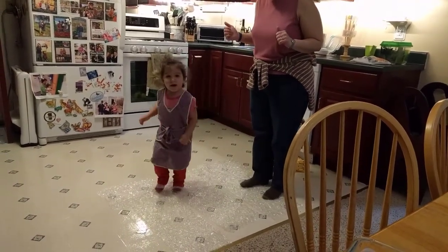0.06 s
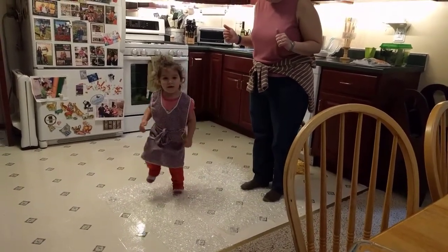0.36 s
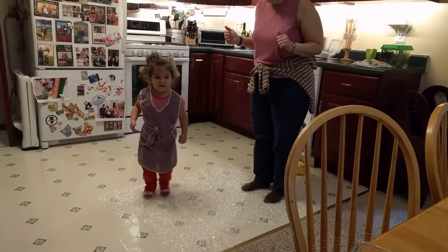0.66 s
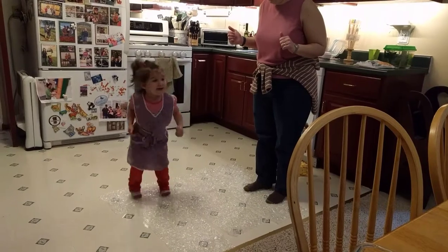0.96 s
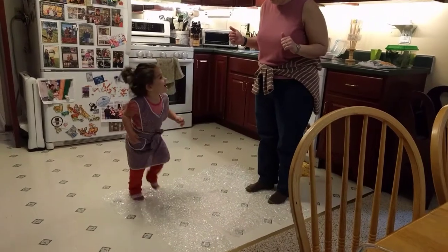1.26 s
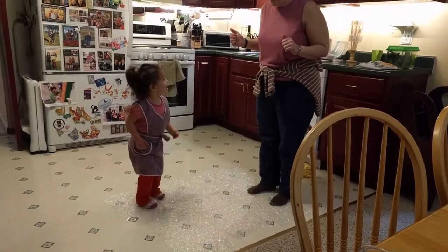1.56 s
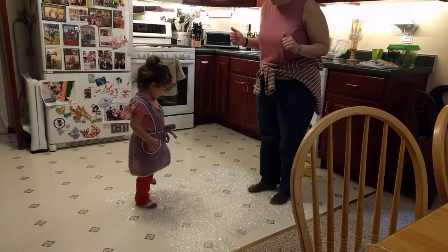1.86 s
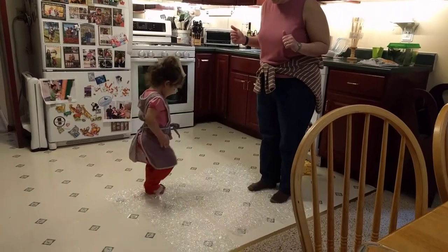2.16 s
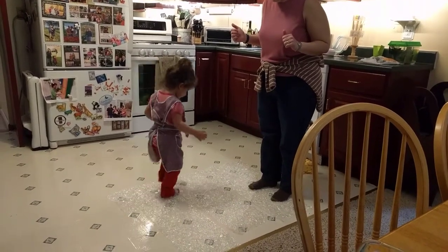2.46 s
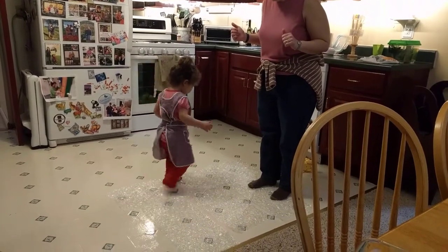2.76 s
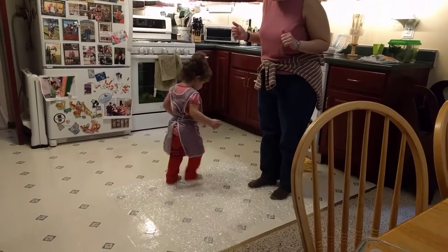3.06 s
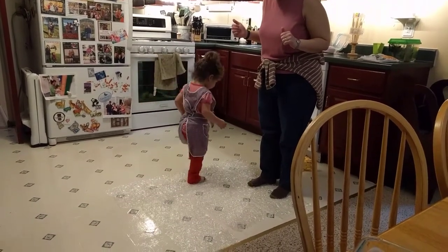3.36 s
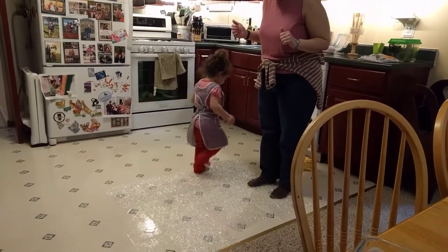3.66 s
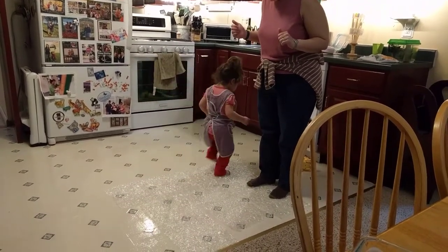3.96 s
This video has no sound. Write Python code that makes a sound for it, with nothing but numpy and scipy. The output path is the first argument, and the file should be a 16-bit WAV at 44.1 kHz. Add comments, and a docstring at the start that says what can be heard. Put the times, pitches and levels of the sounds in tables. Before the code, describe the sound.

Bubble wrap pops sharply and irregularly under a small child's steps, with crinkling plastic and soft thuds on a hard floor. Pops start at once and come singly or in small clusters, with loud ones around 0.5, 1.7 and 2.4 seconds. The heaviest footfalls land at 3.1 and 3.5 seconds, then a loud cluster bursts at 3.9. Everything sounds nearby, with a short kitchen echo.

```python
"""A small child treads on bubble wrap on a hard kitchen floor, heard nearby through one microphone.
Over quiet room air and a faint hum, the first step bursts three bubbles, each a crack with a short bright
ring. Step after step crinkles the film and thumps the floor; most burst a bubble or a few, and ceiling
and cupboards throw the pops back. A loud double pop comes at 2.4 s, the heaviest treads at 3.1 and 3.5 s,
and a last cluster of pops at 3.9 s. The loudest pops overload the microphone."""
import sys
import numpy as np
from scipy import signal
from scipy.fft import rfft, irfft
from scipy.io import wavfile

SR = 44100
rng = np.random.default_rng(int(sys.argv[2]) if len(sys.argv) > 2 else 0)


def inscribe(sig):
    """Save sig as 16-bit PCM at rate SR to the path in sys.argv[1].

    A 1-D sig is mono; a 2-D sig holds one channel per row.
    Samples are clipped to [-1, 1] before scaling.
    """
    pcm = np.round(np.clip(np.atleast_2d(sig).T, -1, 1) * 32767)
    wavfile.write(sys.argv[1], SR, pcm.astype(np.int16))


N = 176400


def amp(db):
    """Decibels to gain."""
    return 10 ** (np.asarray(db) / 20)


def unit_rms(x):
    """Scales to rms 1."""
    return x / np.sqrt(np.mean(x ** 2) + 1e-20)


def curve_at(points, hz):
    """Reads a table on a log-frequency axis."""
    freqs, values = np.transpose(points)
    return np.interp(np.log(hz + 1e-6), np.log(freqs), values)


def add(mix, start_s, sound):
    """Mixes a sound in at a time."""
    part = mix[max(round(start_s * SR), 0):][:len(sound)]
    part += sound[:len(part)]


def click(gain):
    """The sharpest causal click with the given spectrum."""
    log_gain = np.log(np.maximum(gain, 1e-5))
    mirrored = np.r_[log_gain, log_gain[-2:0:-1]]
    return np.fft.ifft(np.exp(np.conj(signal.hilbert(mirrored)))).real


def coloured_noise(size, spectrum):
    """Noise with the given spectrum, at rms 1."""
    gain = amp(curve_at(spectrum, np.fft.rfftfreq(size, 1 / SR)))
    return unit_rms(irfft(rfft(rng.standard_normal(size)) * gain, size))


def resonance(hz, centre_hz, width_hz):
    """Gain of a resonance with steep skirts."""
    return 1 / (1 + ((hz ** 2 - centre_hz ** 2) / (hz * width_hz)) ** 2)


def room_tone(air_db=-58, hum_hz=147, hum_db=-75):
    """The kitchen at rest: quiet air and a faint appliance hum."""
    # spectrum of the air: (frequency [Hz], level [dB])
    air_spectrum = [(20, -1), (50, -2), (80, -13), (140, 6.5), (250, 0), (400, -12.5), (1000, -23),
                    (3300, -21.5), (7000, -7.5), (16000, -34)]
    hum = np.sqrt(2) * np.sin(2 * np.pi * hum_hz * np.arange(N) / SR)
    return amp(air_db) * coloured_noise(N, air_spectrum) + amp(hum_db) * hum


def floor_to_microphone(direct_db, size=32768, ceiling_s=.00495, scatter_t60_s=.09):
    """Direct sound, a bright slap off the ceiling, cupboard echoes, quick scatter and a longer tail."""
    # the kitchen's reverberation: (frequency [Hz], time to fall 60 dB [s])
    decay_times = [(200, 0.75), (600, 0.47), (1400, 0.5), (3700, 0.37), (6700, 0.42), (10000, 0.38),
                   (16000, 0.29)]
    # colour of the ceiling slap: (frequency [Hz], level [dB])
    ceiling = [(1500, -8), (4300, -10), (6500, -3)]
    # echoes off the cupboards: (delay [s], level [dB])
    cupboards = [(.0013, -14.5), (.0095, -12), (.012, -17), (0.0171, -18.5)]
    t = np.arange(size) / SR
    hz, frame_s, noise = signal.stft(rng.standard_normal(size), SR, nperseg=256)
    decay = amp(-60 * frame_s / curve_at(decay_times, hz)[:, None])
    tail = signal.istft(noise * decay, SR, nperseg=256)[1][:size] * np.minimum(t / 0.011, 1)
    scatter = rng.standard_normal(size) * (rng.random(size) < 3000 / SR)
    scatter *= amp(-60 * t / scatter_t60_s) * np.minimum(t / 0.0019, 1)
    path = amp(-2.5) * tail / np.linalg.norm(tail) + amp(-5.5) * scatter / np.linalg.norm(scatter)
    path[0] += amp(direct_db)
    slap = click(amp(curve_at(ceiling, hz) + direct_db / 2))
    add(path, ceiling_s * (1 + .02 * rng.uniform(-1.4, 1)), slap)  # delays vary from spot to spot
    for delay_s, db in cupboards:
        add(path, delay_s * (1 + .02 * rng.uniform(-1.1, 1)), amp([db + direct_db / 2]))
    return amp(-3) * path


def heel_thud(db, cutoff_hz, size=24000, rise_s=0.0043, hold_s=0.022, t60_s=0.41):
    """A heel sets the floor booming; a softer step leaves only its lowest notes."""
    # spectrum of the boom: (frequency [Hz], level [dB])
    floor_spectrum = [(20, -23), (38, -31), (55, -0.5), (75, 3.5), (98, 2.5), (122, -3.5), (150, 6.5),
                      (185, 1.5), (250, 3), (350, -7), (700, -18)]
    # the floor's notes: (frequency [Hz], level [dB], time to fall 60 dB [s])
    floor_modes = [(52.8, -12.5, 0.48), (145.9, -11, 0.28), (247, -14, .28)]
    t, hz = np.arange(size) / SR, np.fft.rfftfreq(size, 1 / SR)
    envelope = np.minimum(t / rise_s, 1) * amp(-60 * np.maximum(t - hold_s, 0) / t60_s)
    boom = coloured_noise(size, floor_spectrum) * envelope
    for mode_hz, mode_db, mode_t60_s in floor_modes:
        mode_envelope = np.minimum(t / hold_s, 1) * amp(-60 * t / mode_t60_s)
        boom += amp(mode_db) * 3 * np.sin(2 * np.pi * mode_hz * t) * mode_envelope
    low_cut = hz / np.hypot(hz, 0.5 * cutoff_hz)  # a harder, quicker step pushes less bass
    high_cut = 1 / np.sqrt(1 + (hz / cutoff_hz) ** 6)
    boom = signal.fftconvolve(boom, click(low_cut * high_cut))[:size]
    return amp(db - 5.5) * unit_rms(boom) * np.sqrt(np.mean(envelope ** 2))


def film_crinkle(snaps_per_s=1800, spread_db=3.9, colours=12, tint_db=1, rise_share=0.27, fall_s=0.0097):
    """Tiny snaps of creasing plastic in many colours, as strong as the foot presses."""
    # the film creases underfoot: (time [s], length [s], level [dB])
    creases = [ (-.01, 0.054, -36.5), (0.143, 0.017, -42), (0.2, 0.016, -42), (0.375, 0.018, -51),
               (0.474, 0.023, -27.5), (0.554, 0.1, -40), (0.682, 0.1, -38), (0.732, 0.028, -39.5),
               (0.843, 0.023, -52), (0.992, 0.022, -45), (1.017, 0.02, -29.5), (1.047, 0.034, -30.5),
               (1.279, 0.017, -51), (1.355, 0.023, -33.5), (1.42, 0.061, -36), (1.477, 0.085, -38),
               (1.591, 0.049, -33.5), (1.654, 0.015, -32), (1.703, 0.022, -37.5), (2.012, 0.025, -33),
               (2.044, 0.047, -40), (2.343, 0.021, -29.5), (2.587, 0.069, -49.5), (2.75, 0.038, -28),
               (2.768, 0.041, -33.5), (2.85, 0.053, -41), (3.108, 0.038, -45), (3.135, 0.014, -30),
               (3.193, 0.011, -34), (3.318, 0.0019, -38.5), (3.479, 0.0089, -45), (3.507, 0.02, -28),
               (3.561, 0.041, -41.5), (3.625, .015, -27.5), (3.811, 0.055, -44), (3.865, 0.0041, -21), ]
    # spectrum of a snap: (frequency [Hz], level [dB])
    film_spectrum = [(100, -24.5), (500, -11), (780, -13.5), (1400, -14.5), (2500, -11.5), (3500, -8),
                     (5000, -4), (6700, 4), (8200, -7.5), (10500, -15.5), (15500, -23)]
    t, hz = np.arange(N) / SR, np.fft.rfftfreq(1024, 1 / SR)
    power = np.full(N, amp(-64.5) ** 2)  # the film never quite rests
    for start_s, length_s, db in creases:
        swell = np.clip((t - start_s) / (rise_share * length_s), 0, 1)
        fall = np.exp(-np.maximum(t - start_s - length_s, 0) / fall_s)
        power += (amp(db) * swell * fall) ** 2
    sizes = amp(spread_db * np.minimum(rng.exponential(1, N), 3))
    impulses = sizes * rng.choice([-1, 1], N) * (rng.random(N) < snaps_per_s / SR)
    snaps = unit_rms(impulses) * np.sqrt(power)
    colour_of_snap = rng.integers(0, colours, N)
    tints = tint_db * rng.standard_normal((colours, len(film_spectrum)))
    film = np.zeros(N)
    for colour, tint in enumerate(tints - tints.mean(0)):
        tinted = [(band_hz, db + shift) for (band_hz, db), shift in zip(film_spectrum, tint)]
        snap = click(amp(curve_at(tinted, hz)))
        film += signal.oaconvolve(snaps * (colour_of_snap == colour), snap / np.linalg.norm(snap))[:N]
    return signal.fftconvolve(film, floor_to_microphone(direct_db=-1))[:N]


def bubble_pop(ring_db, ring_hz, crack_db, crack_hz, lower_db, lower_hz, direct_db):
    """The film tears with a tick and a broad crack, and the opened cavity rings for a few cycles."""
    # spectrum of the cavity's ring: (frequency [multiple of the pitch], level [dB])
    ring_spectrum = [(.1, -21.5), (.45, -26), (.72, -14), (.88, -5), (1, 1), (1.1, -1), (1.24, -10.5),
                     (1.5, -20.5), (2.3, -34)]
    # spectrum of the tear: (frequency [multiple of the centre], level [dB])
    crack_spectrum = [(.08, -17), (.25, -9), (.5, -3.5), (1, 1.5), (2, -5.5), (3.5, -15), (6, -22.5),
                      (14, -34)]
    # colour that all cracks share: (frequency [Hz], level [dB])
    crack_body = [(200, -2), (500, -2), (800, -1), (1300, -2), (2400, 0.5), (3400, 4)]
    hz = np.fft.rfftfreq(2048, 1 / SR) + 1
    ring = amp(ring_db + curve_at(ring_spectrum, hz / ring_hz))
    crack = amp(crack_db + curve_at(crack_spectrum, hz / crack_hz) + curve_at(crack_body, hz))
    # the tick grows more slowly than the ring
    tick = amp(-9 + 0.1865 * ring_db) * resonance(hz, centre_hz=12600, width_hz=8400)
    burst = np.linalg.norm([ring, crack, tick], axis=0)
    lower_ring = amp(lower_db) * resonance(hz, lower_hz, width_hz=2140)
    path = floor_to_microphone(direct_db)
    into_room = click(np.hypot(burst, amp(-7) * lower_ring))  # less of the lower ring reaches the room
    sound = signal.fftconvolve(into_room, np.r_[0, path[1:]])
    add(sound, 0, path[0] * click(np.hypot(burst, lower_ring)))  # straight to the microphone
    return sound


def scene():
    """Pops and footfalls over the crinkling film and the room tone, in mono."""
    # bursting bubbles: (time [s], ring level [dB], ring pitch [Hz], crack level [dB], crack centre [Hz],
    # lower ring level [dB], lower ring pitch [Hz], direct path [dB]); a covering foot weakens that path
    pops = [ (0.0464, 19, 6460, -16, 1200, 11, 4500, -3), (0.0515, 19, 6700, -3, 1770, 17.5, 4500, -7),
            (0.0529, 19, 6900, -2, 1800, 8, 4500, -13), (0.1955, 11.5, 5900, 5.5, 850, 3, 4300, -7.5),
            (.2027, 8.5, 6630, 2, 2580, -4, 4300, -5), (0.496, 13.5, 7600, 23, 1110, 20, 3480, -2.5),
            (1.0733, 17, 6000, 4.5, 1300, 14, 4500, -8), (1.0794, 15.5, 6550, 7.5, 1400, 15, 4460, -11.5),
            (1.4005, 14.5, 6900, -18, 2460, 15.5, 4450, -7.5), (1.4033, 13, 6640, -23, 2530, 3, 4370, -2),
            (1.4517, 22, 6370, 3, 2380, 8, 4200, -5.5), (1.6549, 12, 7440, 5.5, 960, 11, 4500, -5),
            (1.7369, 19.5, 6840, 16, 1640, 23, 4620, 6.5), (2.1086, 21.5, 6600, 4, 1330, 16.5, 4100, -5),
            (2.3693, 28.5, 6390, 19, 1670, 11, 4400, 4), (2.3705, 23.5, 6000, 16.5, 1780, 4, 4400, 6),
            (2.8248, 10.5, 6700, 8.5, 1100, 5, 4500, -6), (2.8296, 19, 6570, 1, 1410, 0, 4500, -16),
            (2.8311, 18, 6400, 7.5, 1890, 17, 4270, -3), (3.6227, 16, 7070, -0.5, 1210, 2, 3650, -11),
            (3.8695, 25, 6680, 22.5, 2050, 5, 3400, 14), (3.8731, 16.5, 6800, 13.5, 2080, 2, 3400, 16),
            (3.8798, 10.5, 6900, -1, 2400, 4, 3400, 12), (3.8814, 16.5, 6400, 12.5, 1750, 0, 3400, 16), ]
    # footfalls: (time [s], level [dB], hardness as a cut-off [Hz])
    steps = [(0.056, -43, 117), (0.201, -35.5, 416), (0.497, -31.5, 176), (0.76, -40.5, 72.7),
             (1.069, -39, 210), (1.398, -32.5, 130), (1.672, -39, 79), (2.043, -39, 71),
             (2.371, -39.5, 255), (2.773, -34.5, 254), (2.831, -37, 410), (3.134, -24.5, 224),
             (3.512, -23.5, 196), (3.628, -41.5, 296), (3.872, -31, 160)]
    mix = room_tone() + film_crinkle()
    for start_s, *bubble in pops:
        add(mix, start_s, bubble_pop(*bubble))
    for start_s, db, cutoff_hz in steps:
        add(mix, start_s, heel_thud(db, cutoff_hz))
    return mix[None]


def record(dry, overload=.63, top_hz=16100):
    """The microphone flattens the highest peaks; then the top of the treble is cut off."""
    oversampled = signal.resample_poly(dry, 4, 1, axis=1)
    flattened = oversampled / (1 + (oversampled / overload) ** 8) ** (1 / 8)
    clipped = signal.resample_poly(flattened, 1, 4, axis=1)
    band_limit = signal.firwin(301, top_hz, window=("kaiser", 9), fs=SR)
    return signal.oaconvolve(clipped, band_limit[None], "same")


dry = scene()
out = record(dry)
inscribe(out)
```